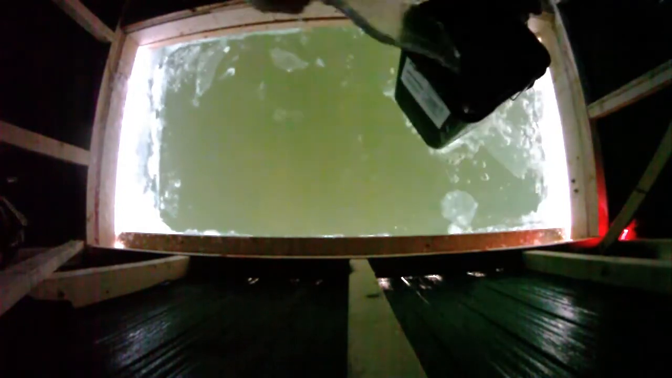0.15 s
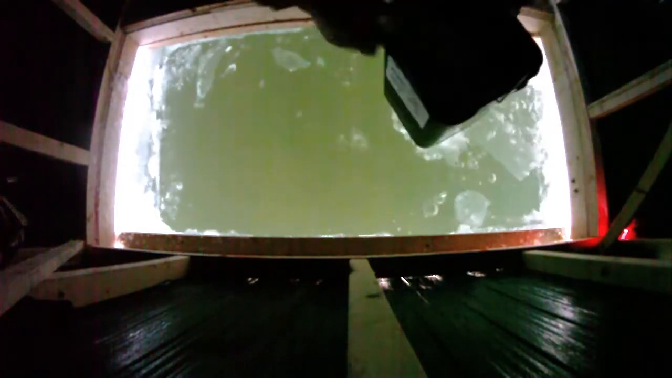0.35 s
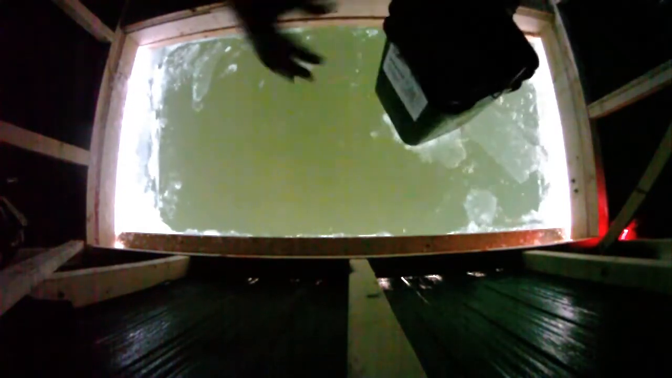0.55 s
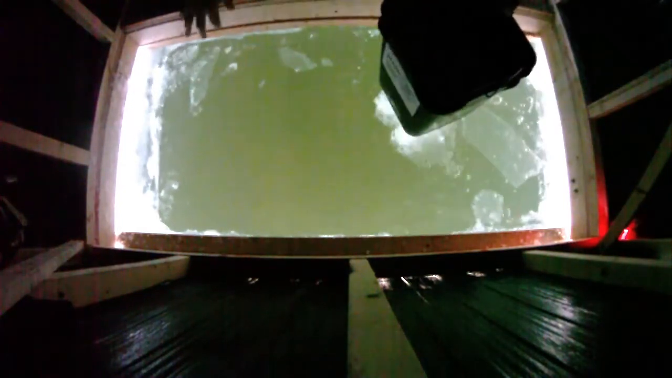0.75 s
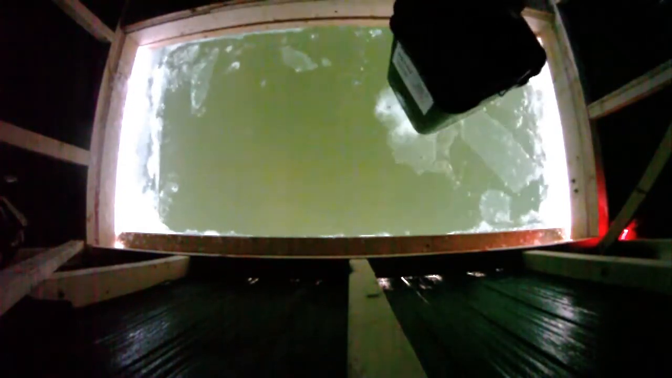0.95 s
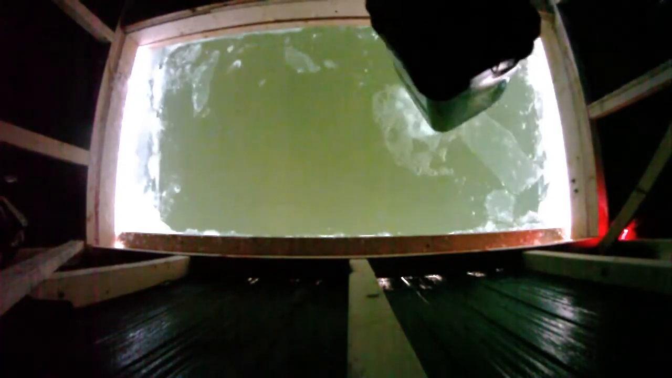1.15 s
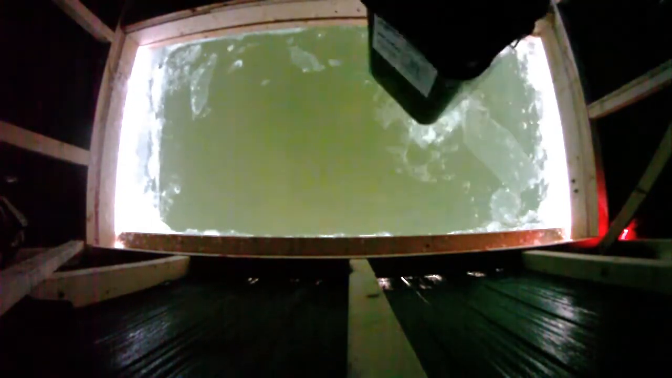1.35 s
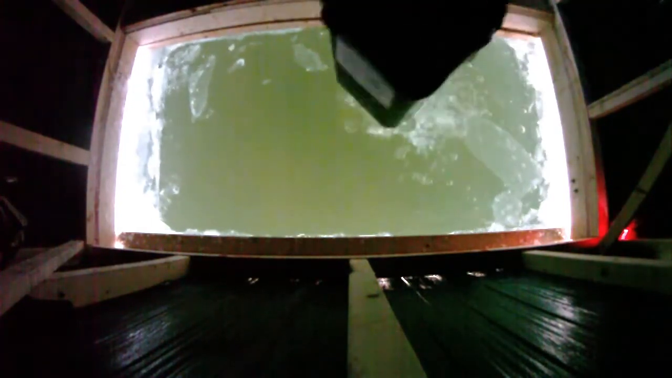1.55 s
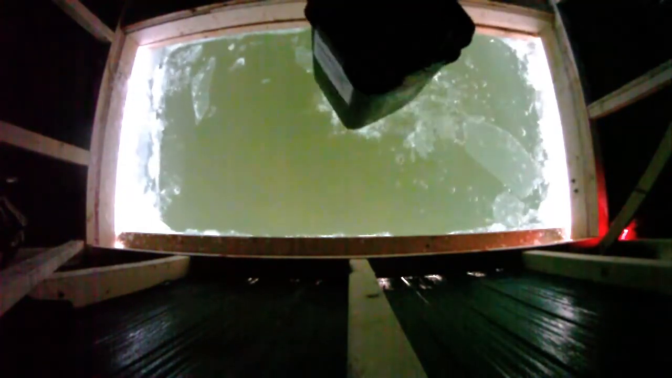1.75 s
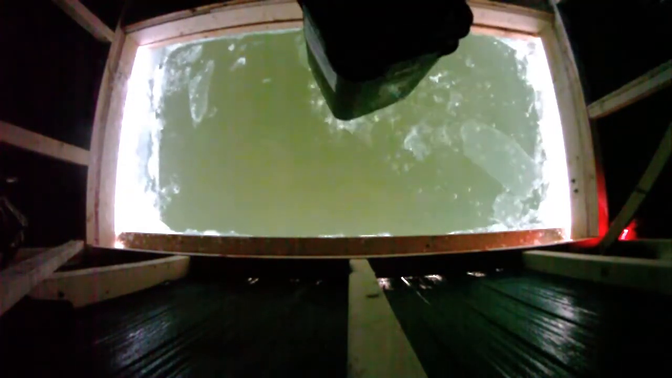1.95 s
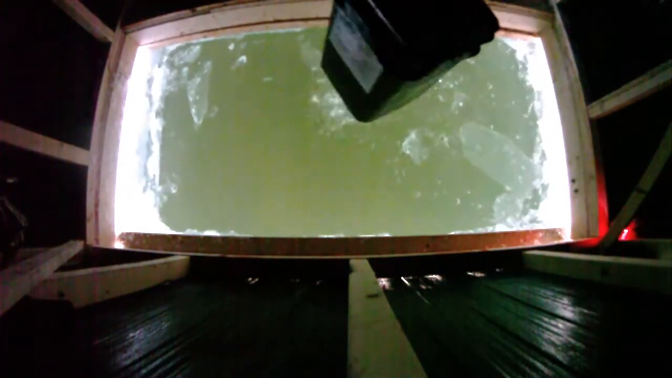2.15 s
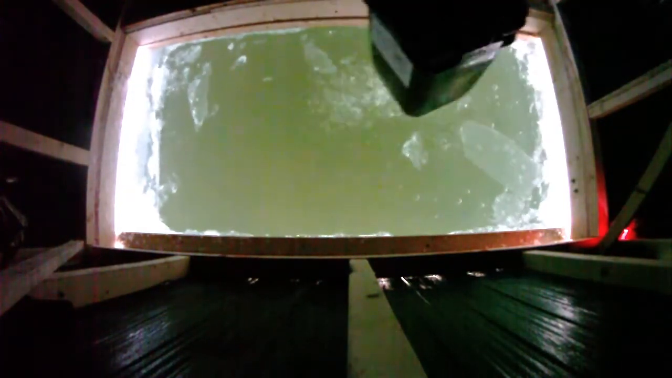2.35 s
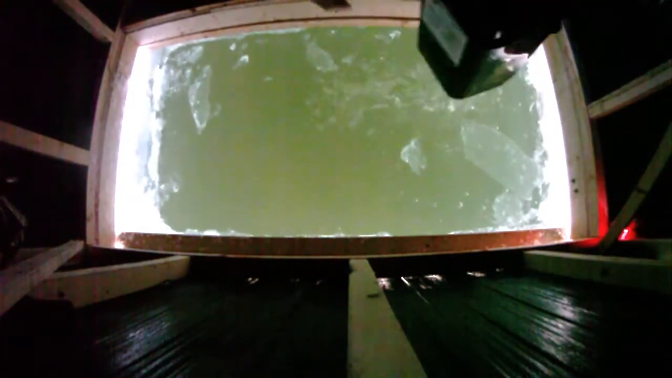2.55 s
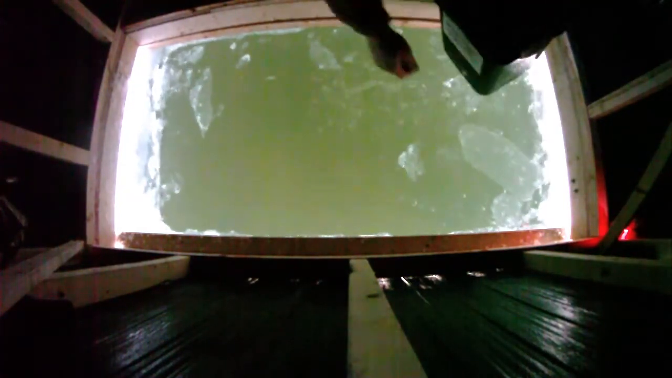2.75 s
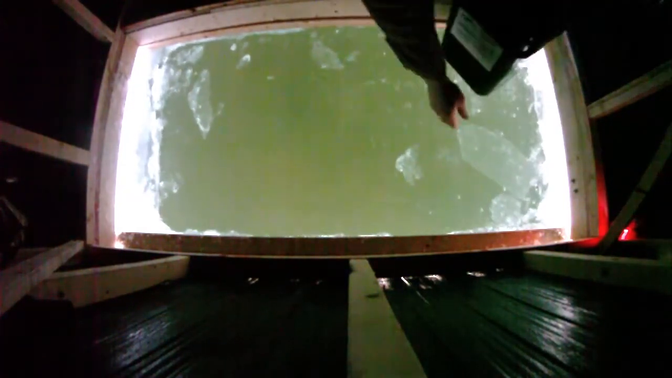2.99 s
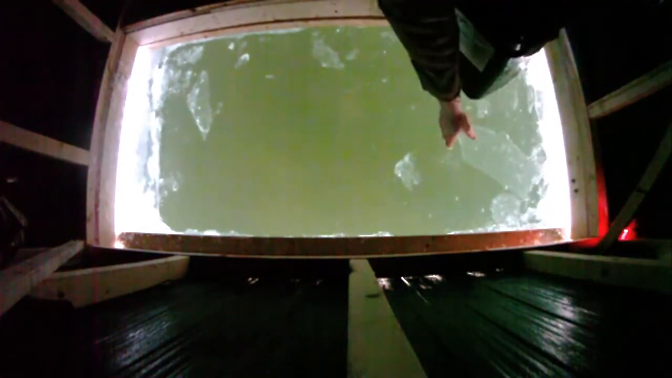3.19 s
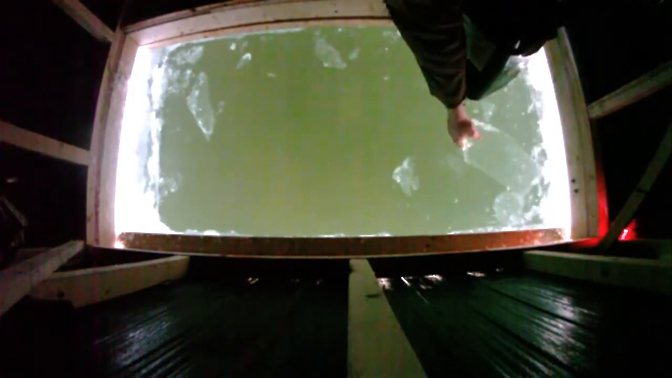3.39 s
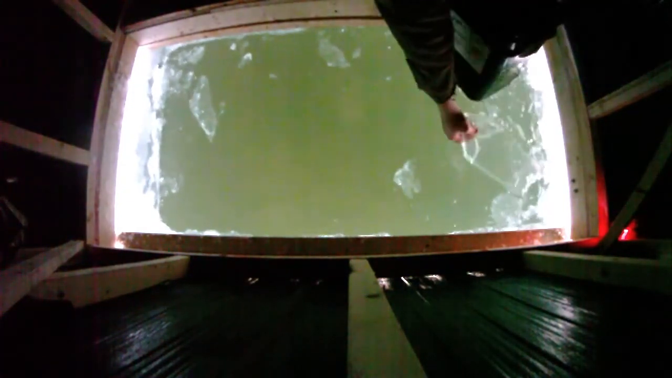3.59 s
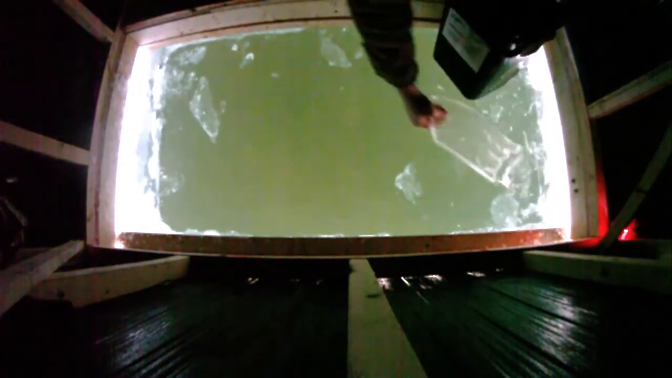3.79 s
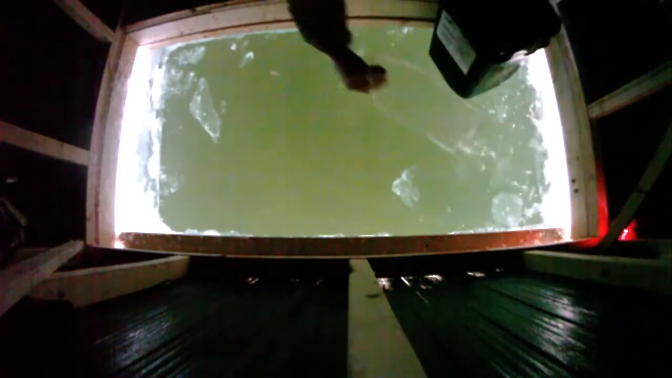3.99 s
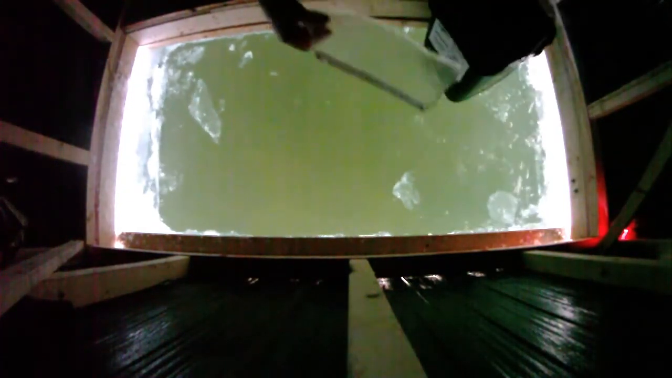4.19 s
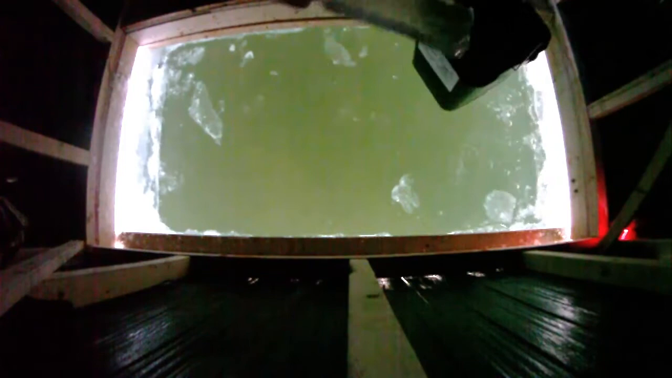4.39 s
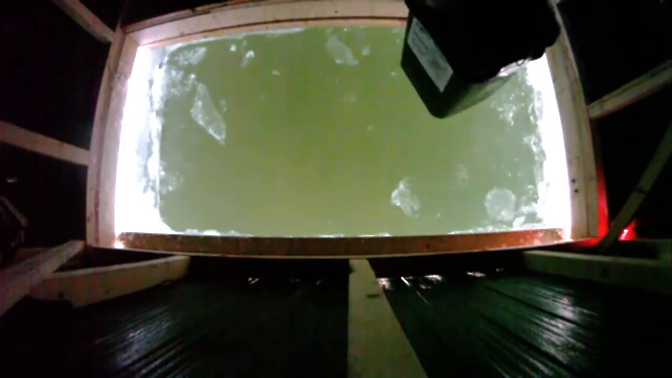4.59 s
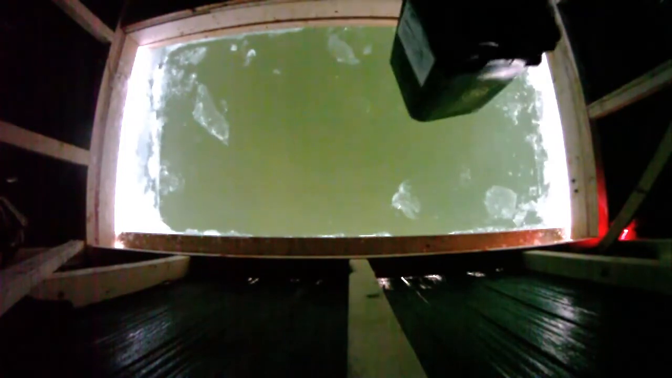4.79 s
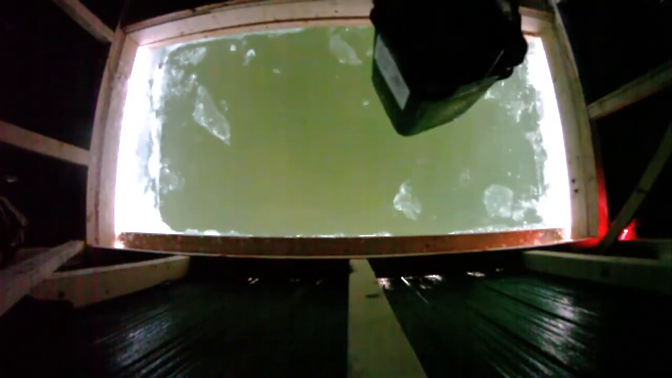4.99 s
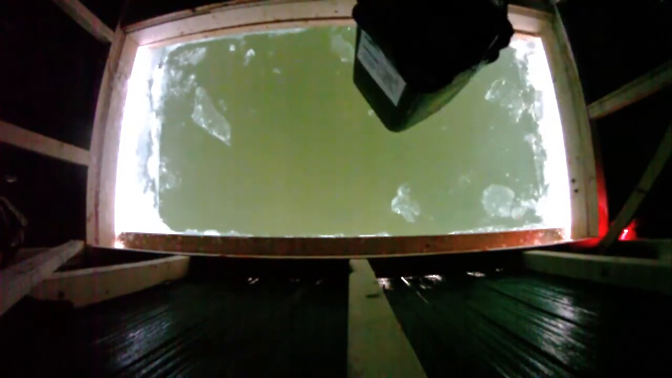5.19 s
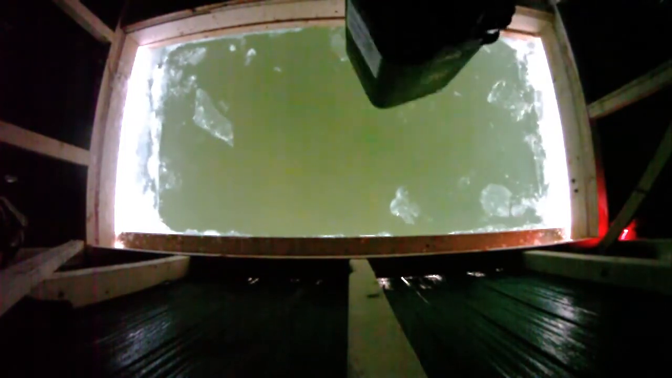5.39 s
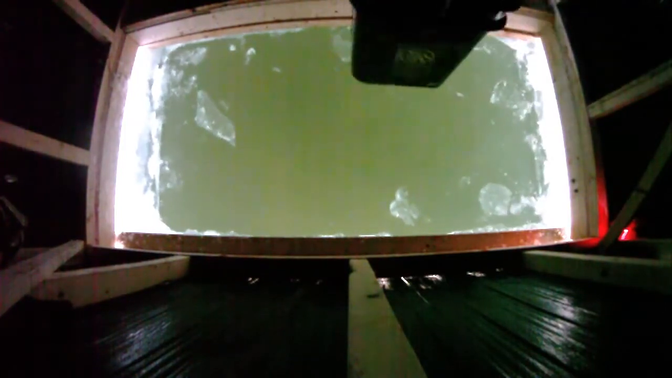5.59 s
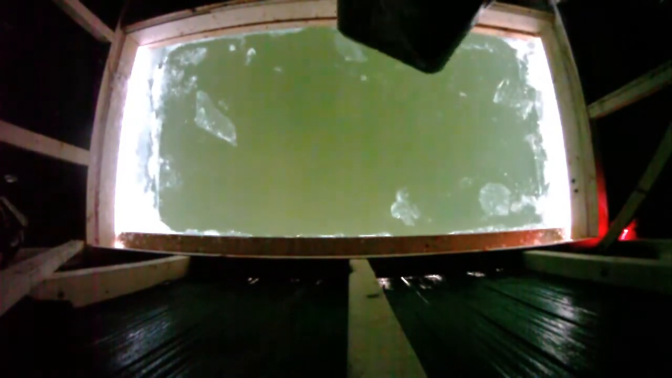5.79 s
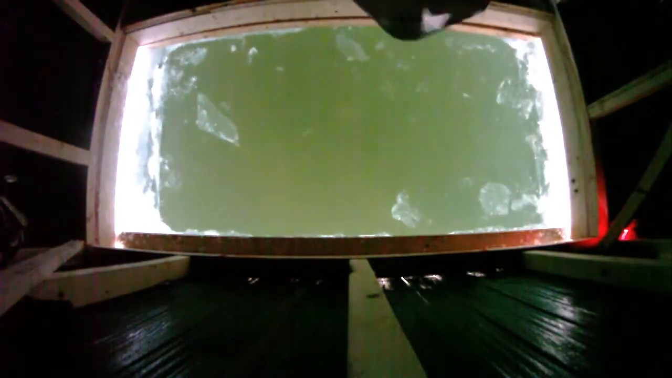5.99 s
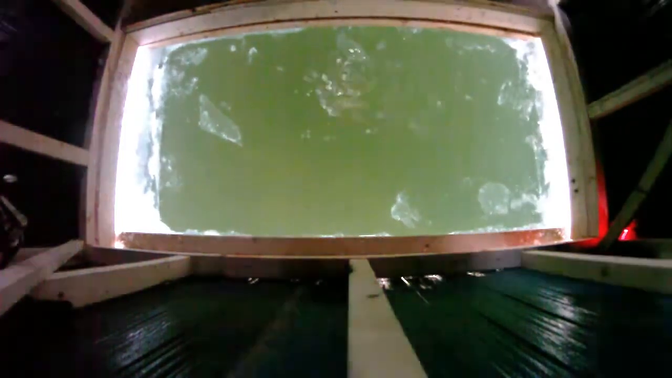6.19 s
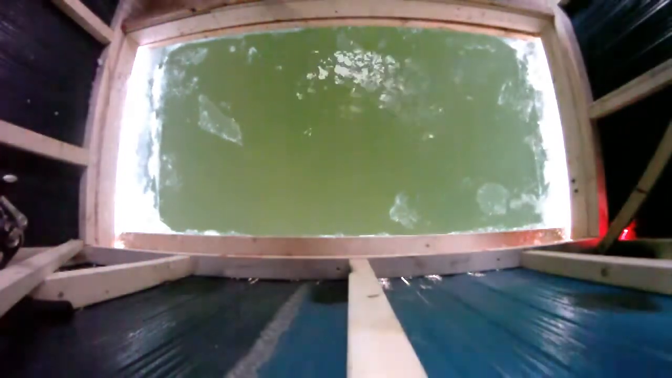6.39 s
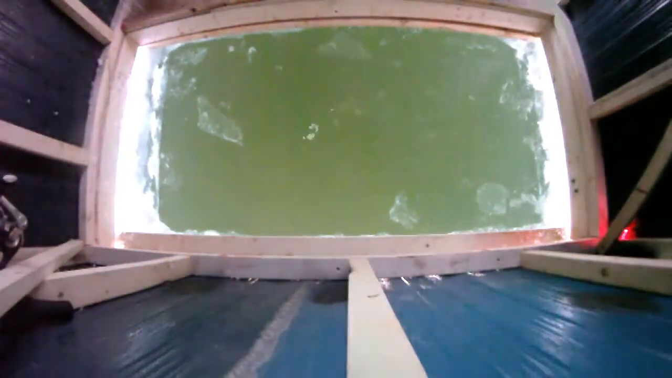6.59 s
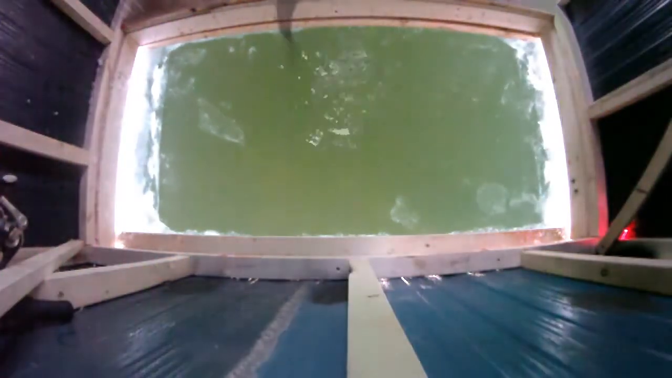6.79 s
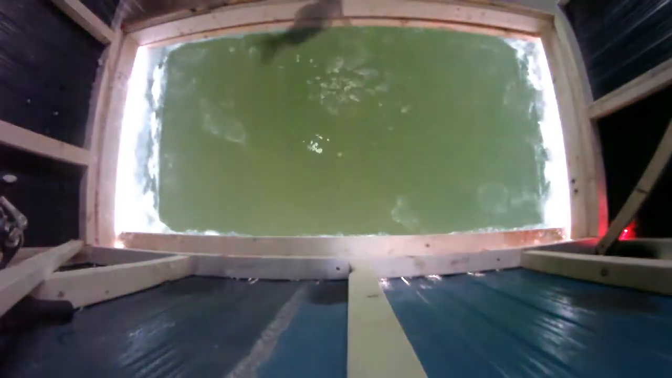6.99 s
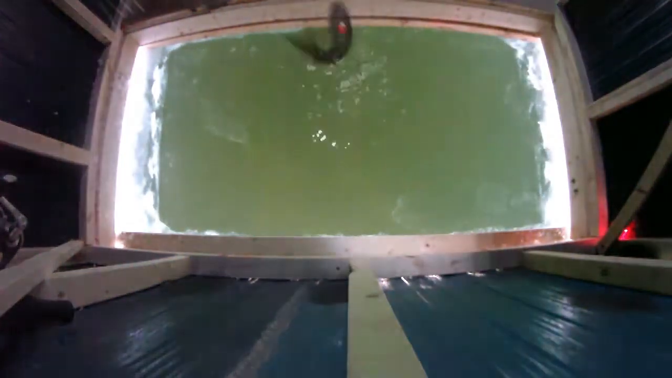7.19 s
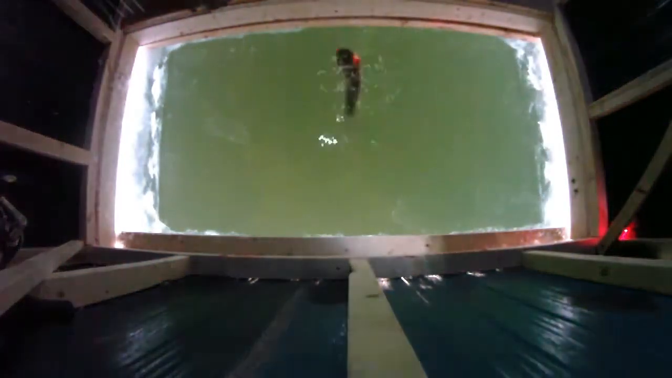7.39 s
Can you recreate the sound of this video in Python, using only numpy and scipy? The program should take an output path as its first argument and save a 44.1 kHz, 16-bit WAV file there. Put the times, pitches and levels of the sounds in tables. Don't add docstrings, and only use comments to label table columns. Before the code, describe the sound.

Close watery slaps and sloshing with ice cracks, hollow bucket knocks, drips and plinks, then rough scraping and finally a sharp gassy hiss.

```python
import sys
import numpy as np
from scipy import signal
from scipy.fft import rfft, irfft, next_fast_len
from scipy.io import wavfile
from scipy.ndimage import uniform_filter1d, map_coordinates

SR = 44100
rng = np.random.default_rng(int(sys.argv[2]) if len(sys.argv) > 2 else 0)


def amp(db):
    return 10 ** (np.asarray(db, float) / 20)


def write(x):
    x = np.atleast_2d(x).T
    wavfile.write(sys.argv[1], SR, np.round(np.clip(x, -1, 1) * 32767).astype(np.int16))


N = 328545
ATTACK_S, RELEASE_DB_PER_S = 0.0021, 179


def unit(x):
    return x / np.sqrt(np.mean(x ** 2) + 1e-20)


def energy_sum(*gains):
    return np.sqrt(np.sum(np.square(gains), axis=0))


def along(points, hz):
    f, v = np.transpose(points)
    return np.interp(np.log(hz + 1), np.log(f + 1), v)


def curves(rows):
    s, *cols = np.transpose(rows)
    return [np.interp(np.arange(N) / SR, s, c) for c in cols]


def noise():
    return rng.standard_normal(N)


def wobble(rate):
    coarse = np.arange(0, N + 16, 16)
    knots = rng.standard_normal(N // 40)
    return np.interp(np.arange(N), coarse, map_coordinates(knots, [coarse * rate / SR]))


def flutter(length, depth, size):
    drift = uniform_filter1d(rng.standard_normal(length), size=size)
    return 1 + depth * np.tanh(unit(drift))


def filtered(x, response):
    m = next_fast_len(N + SR // 2)
    return irfft(rfft(x, m) * response(np.fft.rfftfreq(m, 1 / SR)), m)[:N]


def modes(table):
    def response(f):
        return sum((-1) ** k * amp(db) * 1j * f * width / (centre ** 2 - f * f + 1j * f * width)
                   for k, (centre, width, db) in enumerate(table))
    return response


def patchy(patchy_db):
    z = signal.stft(noise(), nperseg=256)[2]
    field = uniform_filter1d(rng.standard_normal(z.shape), 3, 0)
    field = uniform_filter1d(field, 8, 1)
    return signal.istft(z * amp(patchy_db * unit(field)), nperseg=256)[1][:N]


def coloured(x, spectrum):
    def response(hz):
        inside = (hz > spectrum[0][0]) & (hz < spectrum[-1][0])
        return amp(along(spectrum, hz)) * inside
    return unit(filtered(x, response))


def span(start, end, edge):
    corners = [start - edge / 2, start + edge / 2, end - edge / 2, end + edge / 2]
    return np.interp(np.arange(N) / SR, corners, [0, 1, 1, 0])


def place(out, s, sound):
    out[round(s * SR):][:len(sound)] += sound


def puff(t, t60):
    return amp(-60 * t / t60) * (1 - np.exp(-t * 2000)) * rng.standard_normal(len(t))


def surge(s, db, climb, hold, release):
    climb_db, sag_db_per_s = 22, 8
    t = np.arange(0, N, 64) / SR
    age = t - s[:, None]
    sag = -sag_db_per_s * np.minimum(age, hold) - release * np.maximum(age - hold, 0)
    shape_db = np.where(age < 0, climb_db * age / climb, sag)
    power = np.sum(amp(2 * (db[:, None] + shape_db)), axis=0)
    return np.interp(np.arange(N) / SR, t, np.sqrt(power))


def slosh():
    # (time [s], hollow level [dB], hold [s], splash over
    # hollow [dB], thud over hollow [dB])
    sudden_slaps = [(0.479, -28.5, 0.18, 5.5, -3.5), (0.575, -17, 0.038, 1, -10), (0.632, -18, 0.061, 1, -9.5),
                    (1.294, -35, 0.097, -11, 1.5), (1.392, -29.5, 0.16, -4.5, -4.5),
                    (1.601, -30, 0.028, -6.5, -1), (2.546, -30, 0.069, -8.5, -5), (2.741, -42, 0.077, -4, 3),
                    (2.892, -45.5, 0.015, -5, 5.5), (3.158, -33, 0.037, -1.5, -3), (3.23, -32.5, 0.011, 1, 1.5),
                    (3.34, -46, 0.1, 1.5, -6), (3.434, -28, 0.0034, -3, -15), (3.574, -42.5, 0.014, 1.5, 1),
                    (3.894, -53.5, .03, 3.5, -18), (3.97, -67, 0.048, 12, -10), (4.057, -47.5, 0.051, -14, -18),
                    (4.104, -47, 0.014, -2, 5),
                    (4.589, -42, 0.24, 5, -8), (4.726, -32, 0.1, -1, -4), (4.835, -20, 0.092, 2.5, -7.5),
               (5.515, -42.5, .05, -2.5, 4.5), (5.68, -32.5, .03, 0, -6), (5.798, -42, 0.057, -24, 3),
               (5.946, -40, 0.037, -1, -2), (5.984, -38, 0.012, 1.5, -9), (6.164, -38, .03, -7.5, 8),
               (6.252, -33, 0.06, -12, 0), (6.481, -36, 0.05, -1, 2), (6.617, -40, 0.1, -12, 1.5),
               (6.719, -28.5, 0.034, 2.5, 0), (7.147, -23, 0.025, 1, -3)]
    # (crest time [s], hollow level [dB], climb [s], splash over hollow [dB], thud over hollow [dB])
    waves = [(0.0, -40.5, .05, -11, -1), (0.824, -20, 0.26, 1, -9.5), (1.05, -44.5, 0.46, -13, 0.5),
             (1.888, -32.5, 0.11, 6, 1.5), (4.97, -21, 0.25, -1, -4), (5.132, -17.5, 0.27, -1, -14),
             (5.32, -36.5, 0.53, -8, -2.5), (6.14, -54, .1, -4, 11), (6.42, -40, 0.59, -9, -3),
             (6.871, -21, 0.21, -3, -5), (7.05, -32.5, 0.85, 0, 3.5), (7.41, -35.5, 0.79, 2.5, 1.5)]
    spray_grows, spray_db, spray_release = 1.74, 7, 159
    s, db, length, wet_db, heft_db = np.transpose(sudden_slaps + waves)
    slap = (np.arange(len(s)) < len(s) - len(waves))[:, None]
    climb = np.where(slap, ATTACK_S, length[:, None])
    hold = slap * length[:, None]
    crest = s + ATTACK_S * slap[:, 0]
    splash_db = db + wet_db
    levels = db, splash_db, spray_grows * splash_db + spray_db, db + heft_db
    releases = RELEASE_DB_PER_S, RELEASE_DB_PER_S, spray_release, RELEASE_DB_PER_S
    return [surge(crest, level, climb, hold, release) for level, release in zip(levels, releases)]


def hollow_frame():
    # (frequency [Hz], width [Hz], level [dB])
    shelter = [(243, 121, 1), (354, 170, -0.5), (546, 137, -3.5), (760, 75, -13)]

    def cavity(hz):
        return modes(shelter)(hz) / (1 + (hz / 800) ** 4) / (1 + (170 / (hz + 1)) ** 4)
    return unit(filtered(noise() * amp(0.91 * wobble(77)), cavity))


def bubbles(count, centre_hz, cycles, spread_db, size, rise):
    when, pitch, share = rng.random((3, count, 1)).astype(np.float32)
    t = np.arange(size, dtype=np.float32) / SR
    hz = centre_hz * 2 ** (2.4 * (pitch - .5))
    age = t * hz / cycles
    loudness = amp(-spread_db * np.log(share + 0.015))
    tone = loudness * age * np.exp(-3 * age) * np.sin(2 * np.pi * hz * t * (1 + rise * age))
    at = (when * N).astype(int) + np.arange(size)
    return unit(np.bincount(at.ravel(), tone.ravel(), minlength=N)[:N])


def splashing():
    # (frequency [Hz], spectral level [dB/Hz])
    splash = [(380, -6.5), (620, -6), (750, -1), (1000, -4.5), (2000, -6.5), (3000, -12), (4200, -19.5),
              (6500, -31)]
    cloud = bubbles(count=1100, centre_hz=1208.8, cycles=25.5, spread_db=-0.5, size=1400, rise=0.04)
    return unit(0.6 * coloured(patchy(0.51), splash) + 0.41 * cloud)


def water(hollow_gain, splash_gain, spray_gain):
    # (time [s], patter level [dB], gurgle over patter [dB])
    runoff = [(0, -43.5, 3), (.4, -45, 1.5), (1.0, -44, 1.5), (1.27, -45, 7), (1.84, -36.5, -0.5),
              (2.09, -39.5, 4), (2.14, -43, 3.5), (2.7, -44, 2), (2.9, -47.5, -16), (3.1, -43.5, -1.5),
              (3.4, -52, -17), (3.8, -62.5, 2.5), (4.2, -57.5, -4.5), (4.5, -56, -3), (5.33, -47, 3),
              (5.62, -54.5, -1), (5.9, -57.5, 10.5), (6.55, -49.5, -14)]
    # (time [s], level [dB], hold [s], fine spray over level [dB])
    bursts = [(0.471, -28.5, 0.024, -10), (0.547, -26.5, 0.025, -10), (2.78, -43, 0.1, -20),
              (3.174, -39.5, 0.1, -17), (3.02, -56, 0.033, 3), (3.61, -58, 0.011, -3),
              (3.892, -50.5, 0.037, -22), (3.947, -56, .04, -2), (4.082, -52, .03, -11),
              (4.103, -49, 0.015, -4), (5.22, -37, 0.015, -7), (5.979, -46, 0.038, -6)]
    # (frequency [Hz], spectral level [dB/Hz])
    coarse_spray = [(2000, -2.5), (3000, -1.5), (5000, -1), (8200, -6), (8500, -47)]
    fine_spray = [(7900, -16), (8400, -2.5), (12000, -3), (15800, -9)]
    patter_db, gurgle_db = curves(runoff)
    s, db, hold, fine_db = np.transpose(bursts)
    burst, fine_burst = [surge(s + ATTACK_S, level, ATTACK_S, hold[:, None], RELEASE_DB_PER_S)
                         for level in (db, db + fine_db)]
    lap = amp(-55.5 + 0.21 * (patter_db + gurgle_db + 44.5))
    hollow = energy_sum(hollow_gain, lap) * hollow_frame()
    splash = energy_sum(splash_gain, amp(patter_db + gurgle_db)) * splashing()

    patter = patchy(2.3) * amp(0.96 * wobble(200))
    mist = energy_sum(spray_gain, burst, amp(patter_db)) * coloured(patter, coarse_spray)
    steady_hiss = np.full(N, amp(-67))
    fine_gain = energy_sum(spray_gain * amp(-9.5), fine_burst, amp(patter_db - 6.5), steady_hiss)
    fine = fine_gain * coloured(patter, fine_spray)

    beads = bubbles(count=500, centre_hz=1700, cycles=22, spread_db=2.5, size=700, rise=.12)
    trickle = amp(1.95 * patter_db + 27) * beads
    return amp(1.04 * wobble(40) - 2.5) * (hollow + splash + mist + fine + trickle)


def knocks():
    # (time [s], peak level [dB], ring frequency [Hz], crack over ring [dB])
    frame_blows = [(0.475, -9, 275, -4), (0.578, -23, 262, -6), (0.607, -20, 325, 6), (0.646, -13, 179, 12),
                   (1.296, -14.5, 277, -10), (1.371, -20, 353, -22), (1.618, -21.5, 230, -19),
                   (1.86, -36, 90, -14), (2.548, -14.5, 292.6, -11), (2.609, -18, 91.5, -15),
                   (3.164, -43, 304, -10), (3.19, -23, 227, 6), (3.239, -14, 239.5, -13),
                   (3.441, -9.5, 243, -12), (3.5763, -23, 267.5, -19), (4.594, -37, 615, -10),
                   (4.846, -11, 290, 7), (5.105, -8, 553, -6), (5.524, -28, 361, -19),
                   (5.548, -21, 225, -8.5), (5.672, -10.5, 224, -32), (5.785, -23.5, 211, -20),
                   (6.159, -24, 89, -29), (6.257, -3, 132, -40), (6.272, -8, 130.4, -40),
                   (6.476, -17.5, 111.6, -22), (7.149, -33, 324, -12), (7.161, -7, 301, -5)]
    # (time [s], peak level [dB], ring frequency [Hz], t60 [s])
    thumps = [
        (0.581, 2.5, 154, 0.039),
        (2.379, -20, 57.7, 0.28),
        (5.671, -4.5, 102.4, 0.057),
        (6.154, -14, 71, 0.43),
    ]
    out, t = np.zeros(N + SR), np.arange(SR // 4) / SR
    blows = [(s, db, hz, 0.15, crack_db) for s, db, hz, crack_db in frame_blows]
    blows += [(*row, -41) for row in thumps]
    for s, db, hz, t60, crack_db in blows:
        ring = np.sin(2 * np.pi * hz * t)
        ring += 0.18 * np.sin(2 * np.pi * 1.9 * hz * t + rng.random() * 2 * np.pi)
        ring *= amp(-60 * t / (t60 + 0.0048)) * (1 - np.exp(-t / 0.0043))
        crack = signal.lfilter([.4], [1, -.75], puff(t, t60 * 0.16 + 0.0083))
        place(out, s, amp(db - 5) * (ring + amp(crack_db) * crack))
    return out[:N]


def drips():
    # (time [s], peak level [dB], bubble frequency [Hz])
    round_drips = [(0.48, -14, 2220), (0.516, -25, 2300), (1.839, -19.5, 656), (1.939, -25, 658),
                   (2.3, -25, 1080), (2.363, -25, 860), (2.418, -28, 2570), (2.803, -21.5, 1273),
                   (2.894, -36, 1010), (3.037, -27.5, 1613), (3.618, -33, 888), (3.817, -39.5, 812),
                   (3.952, -28.5, 1470), (5.614, -37, 1260), (5.988, -23, 1010)]
    # (time [s], peak level [dB], bubble frequency [Hz], life [s], glide [share])
    plinks = [(1.95, -20.5, 536, 0.046, -0.025), (2.12, -30, 559, 0.061, -0.0033),
              (2.365, -43, 2850, 0.056, .02), (2.59, -32, 3900, 0.062, 0.072),
              (2.784, -20, 1774, 0.066, -0.17), (2.79, -30, 3320, 0.038, -0.059),
              (2.963, -32.5, 2060, 0.038, 0.041), (3.44, -23.5, 1169, 0.034, 0.025),
              (5.35, -31, 584, 0.04, 0.012), (5.69, -21, 990, 0.019, 0.016),
              (5.84, -27.5, 636, 0.073, 0.07), (5.988, -30, 1900, 0.034, 0.016)]
    out, t = np.zeros(N + SR), np.arange(SR // 4) / SR
    for s, db, hz, life, glide in [(*row, 0.035, 0.014) for row in round_drips] + plinks:
        age = t / (life + 0.0023)
        cluster = flutter(len(t), 1.04, 90)
        envelope = (1 - np.exp(-t / 0.00046)) * np.exp(-age ** 2 * 2)
        tone = np.sin(2 * np.pi * hz * t * (1 + glide * age))
        place(out, s, amp(db - 12.0) * cluster * envelope * tone)
    return out[:N]


def snaps():
    # (time [s], peak level [dB], centre frequency [Hz], t60 [s])
    spray_snaps = [(1.372, -13, 1150, 0.31), (2.784, -24, 3080, 0.15), (3.016, -40, 5060, 0.15),
                   (3.618, -30, 1680, 0.13), (3.895, -40, 4960, 0.15), (4.076, -35, 4080, 0.17),
                   (4.114, -21, 3360, 0.26), (4.2294, -44, 7200, 0.19), (4.732, -25, 1320, 0.38),
                   (4.804, -14, 3600, 0.45), (4.8395, -0.5, 3600, 0.45), (5.2487, -20, 2180, 0.13),
                   (5.9897, -20.5, 2050, 0.38), (6.485, -21.5, 2100, 0.1), (6.8035, -11.5, 2180, 0.22),
                   (6.88, -9, 2260, 0.28), (7.149, -15, 2280, 0.23)]
    out, t = np.zeros(N + SR), np.arange(SR // 4) / SR
    for s, db, hz, t60 in spray_snaps:
        band = signal.butter(2, [hz * 0.4, hz * 1.63], "band", fs=SR)
        burst = puff(t, t60 + 0.014) + 2.1 * puff(t, 0.02)
        place(out, s, amp(db - 10) * signal.lfilter(*band, burst))
    return out[:N]


def creak():
    # (start [s], end [s], slip rate [Hz], level [dB])
    start, end, hz, db = (2.485, 2.548, 380, -36)
    turn = 2 * np.pi * hz * np.arange(N) / SR
    return amp(db) * span(start, end, 0.017) * (np.sin(turn) + 0.4 * np.sin(2 * turn) + 0.19 * np.sin(3 * turn))


def scrape():
    # (start [s], end [s], first level [dB], last level [dB])
    drags = [
        (0.716, 0.875, -25, -33),
        (1.373, 1.444, -30, -30.5),
        (1.446, 1.589, -29.5, -29),
        (4.581, 4.66, -41, -32),
        (4.662, 4.718, -41, -33),
        (4.72, 4.784, -26, -23),
        (4.787, 4.846, -27, -19),
        (4.86, 4.99, -21, -24),
        (5.081, 5.183, -26, -25.5),
    ]
    # (frequency [Hz], width [Hz], level [dB])
    bucket = [(336, 26, 5.5), (536, 29, 3), (690, 16, 3), (1092, 9.6, 3.5), (1470, 130, -10.5),
              (2170, 190, -14.5), (2760, 210, -16), (4300, 2100, -31)]
    grip = wobble(90)
    slips = noise() * amp(1.2 * grip)
    tilt = np.pi / 4 * (1 + np.tanh(2 * unit(uniform_filter1d(grip, size=2000))))
    drag = 0
    for start, end, first_db, last_db in drags:
        level = np.interp(np.arange(N) / SR, [start, end], [first_db, last_db])
        drag = drag + span(start, end, 0.0054) * amp(level)

    def wall(shift):
        return filtered(slips, lambda hz: modes(bucket)(hz / shift) / (1 + (300 / (hz + 1)) ** 6))
    return drag * unit(np.cos(tilt) * wall(1) + np.sin(tilt) * wall(1.07))


def pockets():
    # (time [s], length [s], frequency [Hz], peak level [dB])
    air_pockets = [(0.225, 0.056, 631, -45), (0.29, 0.05, 1110, -45), (0.385, .06, 693, -49),
                   (0.499, 0.06, 555, -24), (0.514, 0.067, 279, -26), (0.578, 0.016, 1064, -15.5),
                   (0.603, 0.03, 760, -19), (0.642, 0.033, 1473, -22), (0.662, 0.07, 782, -23),
                   (0.726, .07, 292.5, -21.5), (0.79, 0.071, 300, -17.5), (1.083, 0.077, 1162, -42.5),
                   (1.395, 0.038, 1163, -32), (1.53, 0.054, 221, -25.5), (1.57, 0.012, 3600, -36),
                   (1.771, 0.062, 950, -45), (1.779, 0.033, 284, -39), (1.91, 0.043, 640, -38),
                   (2.212, .05, 565, -48), (2.36, 0.042, 2840, -45), (2.397, 0.031, 3710, -45),
                   (2.464, 0.059, 1050, -41), (3.163, 0.016, 279, -28.5), (3.175, 0.065, 778, -36),
                   (3.245, 0.024, 764, -34), (4.107, 0.035, 1670, -44), (4.803, 0.041, 4300, -35),
                   (4.855, 0.072, 733, -20.5), (4.86, 0.039, 300, -16.5), (4.895, 0.035, 595, -20),
                   (4.945, 0.019, 329, -18), (5.132, 0.046, 312, -29), (5.352, 0.046, 509, -39),
                   (5.561, 0.037, 556, -43), (5.567, 0.032, 3348, -49), (5.69, 0.023, 1163, -31.5),
                   (5.873, 0.042, 705, -39), (5.94, 0.032, 693, -45), (5.985, 0.033, 1900, -39),
                   (6.01, 0.031, 1293, -38), (6.626, 0.09, 286, -32.5), (7.172, 0.041, 267, -15)]
    out, t = np.zeros(N + SR), np.arange(SR // 8) / SR
    for s, length, hz, db in air_pockets:
        age = np.minimum(t / length, 1)
        swell = flutter(len(t), 0.45, 200) * np.sqrt(np.abs(np.sin(np.pi * age)))
        place(out, s, amp(db) * swell * np.sin(2 * np.pi * hz * t * (1 + 0.031 * (age - 1))))
    return out[:N]


def ticks():
    # (time [s], peak level [dB], centre frequency [Hz])
    ice_ticks = [(0.516, -8, 2240), (0.553, -12, 2820), (0.5805, -7, 1600), (0.6042, 0.5, 1290),
                 (0.6463, -2.5, 3180), (1.369, -25, 1300), (3.5743, -42, 2200), (3.618, -28, 1100),
                 (4.078, -34, 1660), (4.599, -22, 1090), (4.7284, -17.5, 2400), (5.0407, -16, 1070),
                 (5.0972, -3.5, 1610), (5.217, -15, 2140), (5.684, -17.5, 1290), (6.225, -35.5, 1120),
                 (6.6175, -24, 2500), (6.805, -12, 2100), (6.817, -4, 1500), (6.83, -14, 1700),
                 (6.877, -16, 3200), (6.895, -8, 2200), (6.953, -16, 1800), (6.587, -40, 1200),
                 (7.1492, -12, 1000), (7.1614, -28, 1000)]
    out, t = np.zeros(N + SR), np.arange(SR // 8) / SR
    for s, db, hz in ice_ticks:
        band = signal.butter(1, [hz * 0.83, hz * 2], "band", fs=SR)
        crack = amp(-60 * t / 0.068) * rng.standard_normal(len(t))
        place(out, s, amp(db - 9) * signal.lfilter(*band, crack))
    return out[:N]


def chips():
    # (time [s], peak level [dB], frequency [Hz], t60 [s])
    ice_chips = [(0.4805, -20.5, 2290, 0.11), (0.5165, -15, 2250, 0.045), (0.5784, -5, 308, 0.045),
                 (0.58, -17, 3200, .03), (0.607, -2, 325, 0.048), (0.565, -22, 1790, .05),
                 (2.782, -36, 6700, .06), (2.788, -38, 2780, 0.16), (2.79, -37, 3070, 0.13),
                 (2.793, -32, 1354, 0.13), (2.856, -37, 7100, .06), (2.958, -40, 7600, .04),
                 (3.014, -41, 4250, .06), (3.02, -44, 4960, 0.092), (3.078, -38, 6460, .04),
                 (3.897, -43, 6100, .04), (3.974, -45, 1496, 0.2), (4.116, -35, 2710, 0.15),
                 (4.117, -32, 2900, 0.1), (4.118, -41, 3290, .12), (4.117, -39, 3870, 0.16),
                 (4.12, -41, 4260, .12), (4.8388, -3, 3080, 0.013), (5.218, -31, 2110, 0.12),
                 (5.456, -47, 3120, 0.14), (5.995, -35, 360, .1), (5.99, -38, 2660, 0.14),
                 (6.26, -21, 282, 0.18), (6.5, -30.5, 525, 0.14), (6.509, -25, 195, 0.12),
                 (7.1446, -10, 263, .1), (7.161, -11.5, 417, 0.12), (2.005, -28, 4060, .04),
                 (1.371, -29, 1210, .04), (3.575, -41, 905, .04), (4.076, -42, 705, .03),
                 (5.672, -32, 740, 0.04), (0.624, -10, 634, 0.1)]
    out, t = np.zeros(N + SR), np.arange(SR // 8) / SR
    for s, db, hz, t60 in ice_chips:
        rough = flutter(len(t), 0.65, int(np.clip(150000 / hz, 20, 400)))
        envelope = amp(db - 60 * t / t60) * (1 - np.exp(-t / 0.00037))
        place(out, s, envelope * rough * np.sin(2 * np.pi * hz * t))
    return out[:N]


def hiss():
    # (start [s], end [s], level [dB])
    flows = [
        (6.617, 6.715, -29.5),
        (6.726, 7.072, -27),
        (7.092, 7.432, -26),
    ]
    # (frequency [Hz], spectral level [dB/Hz])
    jet_spectrum = [(240, -28), (400, -6), (863, -12), (1100, -7), (2380, -14), (4690, -13.5), (5380, -9),
                    (15800, -8.5)]
    # (frequency [Hz], width [Hz], level [dB])
    nozzle = [(973, 32, -1.5), (1580, 33, -2.5), (1900, 73, -5), (2164, 90, -3), (3070, 43, -7),
              (4260, 180, -15.5), (5540, 45, -2), (7200, 84, -8.5), (8100, 180, -8), (9860, 100, -8),
              (12800, 90, -6.5), (14300, 73, -3.5)]
    jet = coloured(patchy(0.5), jet_spectrum)
    whistles = unit(filtered(noise(), modes(nozzle)))
    beat = np.cumsum(96 * (1 + 0.18 * wobble(48))) / SR
    chatter = np.exp(-8 * (beat % 1)) * noise()
    top = coloured(chatter, [(8500, 1), (12000, 5), (15500, -11.0)])
    flow = sum(amp(db) * span(start, end, 0.0009) for start, end, db in flows) * amp(wobble(12))
    return flow * unit(jet + whistles + 0.61 * top)


def shake(thud_gain):
    # (time [s], sway level [dB])
    sway_levels = [(0, -53), (.56, -45), (1.3, -47), (1.45, -42), (1.8, -43.5), (2.34, -45), (2.38, -33),
                   (2.8, -34.5), (3.4, -41.5), (3.8, -45.5), (4.57, -48), (4.7, -35.5), (5.5, -43),
                   (6.1, -42), (6.3, -27), (6.62, -25), (6.8, -14.5), (7.45, -27.5)]
    # (crest time [s], level [dB])
    jolts = [(.58, -32), (1.64, -42), (2.61, -37), (2.761, -23.5), (4.13, -41), (4.88, -34), (5.225, -26),
             (5.54, -30), (5.69, -25), (5.81, -24.5), (5.989, -31), (6.18, -28), (6.658, -14), (6.829, -16),
             (6.89, -27), (7.06, -14), (7.2, -37), (7.41, -23)]
    # (frequency [Hz], spectral level [dB/Hz])
    sway_spectrum = [(8, -16), (14, -9.5), (30, -2.5), (55, -8), (85, -9), (110, -22)]
    thud_spectrum = [(70, -38), (95, -3), (128, 4), (175, -5.5), (230, 0.5)]
    s, db = np.transpose(jolts)
    swing = energy_sum(amp(curves(sway_levels)[0]), surge(s, db, 0.0061, 0, 348))
    sway = coloured(noise() * amp(1.1 * wobble(11)), sway_spectrum)
    thud = coloured(noise(), thud_spectrum)
    thud_level = np.hypot(thud_gain, amp(-55.5))
    return amp(-2.5) * swing * sway + amp(-2.0) * thud_level * thud


def room(x):
    # (frequency [Hz], t60 [s])
    walls = [(150, 0.25), (1500, 0.28), (10000, 0.048)]
    hz, t, z = signal.stft(rng.standard_normal(SR // 3), SR, nperseg=256)
    decay = amp(-60 * t / along(walls, hz)[:, None])
    tail = signal.istft(z * decay, SR, nperseg=256)[1]
    return signal.fftconvolve(np.pad(x, (200, 0)), tail / np.linalg.norm(tail))[:N]


def scene():
    # (start [s], end [s])
    lulls = [
        (6.928, 6.952),
        (7.292, 7.313),
    ]
    *wet_gains, thud_gain = slosh()
    contacts = knocks() + drips() + snaps() + creak()
    body = water(*wet_gains) + contacts + amp(-9.5) * room(contacts)
    body += scrape() + pockets() + ticks() + chips() + shake(thud_gain)
    lull = sum(span(start, end, 0.0017) for start, end in lulls)
    return (body * (1 - 0.63 * lull) + hiss())[None]


def band_limit(x):
    return signal.sosfilt(signal.butter(12, 15980, fs=SR, output="sos"), x)


def record(dry):
    # (start [s], end [s])
    dropouts = [
        (6.204, 6.223),
        (6.568, 6.586),
        (6.706, 6.723),
        (7.072, 7.09),
        (7.436, 7.46),
    ]
    # (time [s], offset [full scale])
    offset = [(0, .038), (5.8842, .034), (5.8848, .072), (5.9822, .075), (5.9828, .04), (6.015, .072),
              (7.45, .072)]
    lost = sum(span(start, end, 0.00089) for start, end in dropouts)
    slow = filtered(dry[0], lambda hz: 1 / (1 + (hz / 60) ** 4))
    x = slow + (dry[0] - slow) * (1 - lost * (1 - amp(-10.0))) + curves(offset)[0]
    x = x / (1 + np.abs(x / .98) ** 6) ** (1 / 6)
    x = filtered(x, lambda hz: 1 / (1 + (hz / 15430) ** 400))
    return band_limit(x[None])


dry = scene()
out = record(dry)
write(out)
```